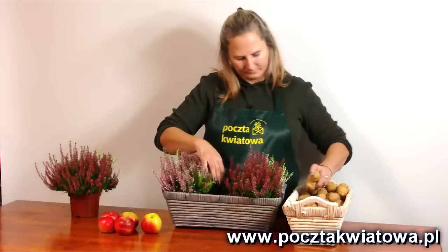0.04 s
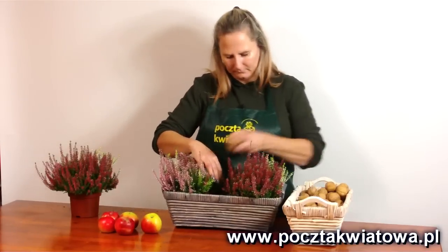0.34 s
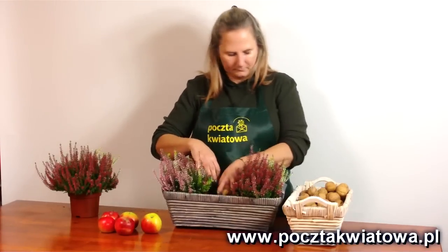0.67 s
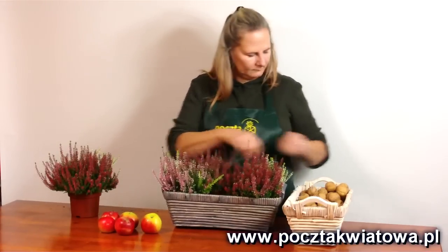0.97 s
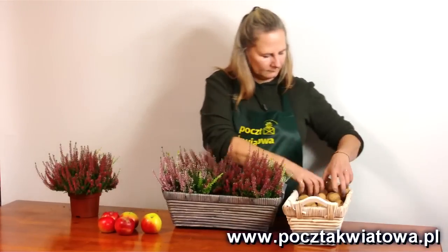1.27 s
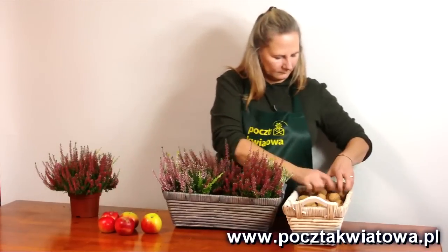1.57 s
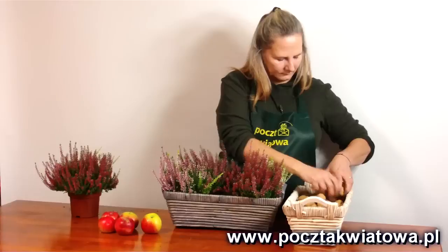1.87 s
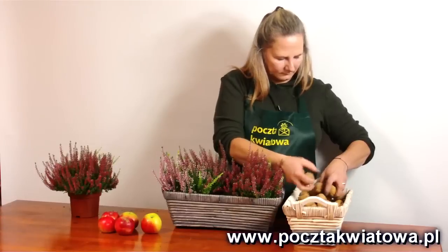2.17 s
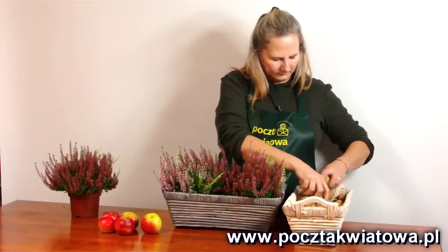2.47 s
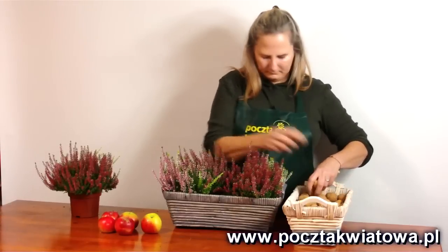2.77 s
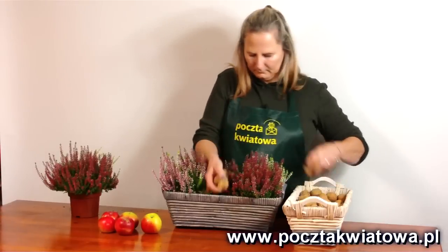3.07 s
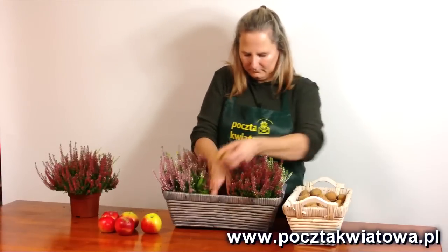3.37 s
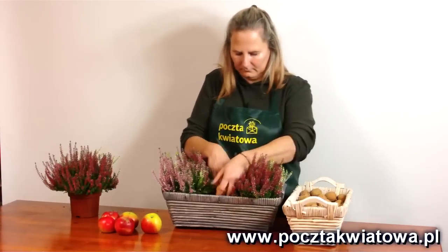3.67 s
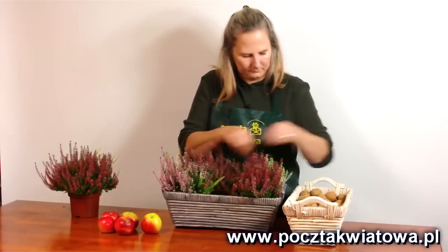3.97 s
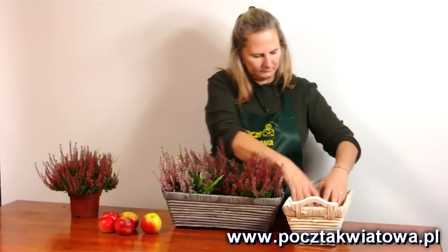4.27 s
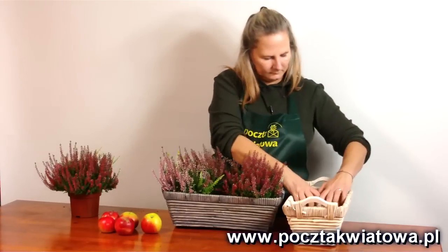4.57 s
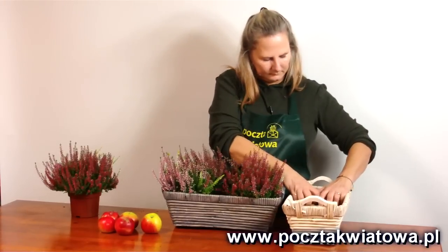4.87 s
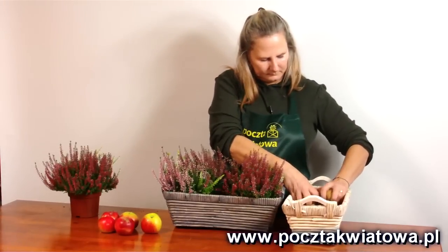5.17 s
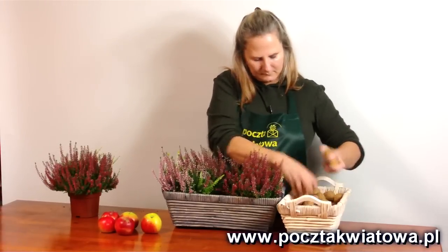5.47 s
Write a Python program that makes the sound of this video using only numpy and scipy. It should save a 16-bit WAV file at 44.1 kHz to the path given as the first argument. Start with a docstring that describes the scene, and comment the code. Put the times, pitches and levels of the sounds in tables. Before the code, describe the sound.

Two handfuls of walnuts drop into a planter with hollow, ringing knocks, between softer clicks of nuts being gathered from a basket.

```python
"""Walnuts into a planter

Walnuts are picked from a wicker basket and dropped by the handful into a planter on a wooden table.
Each knock sounds the hard shell, a bright crack and the hollow under it; in between, nuts rub and roll.
A small bare room rings and hums behind them, heard from one spot by a nearly mono camera microphone."""
import sys
import numpy as np
from scipy import signal
from scipy.fft import rfft, irfft
from scipy.io import wavfile

SR = 44100
rng = np.random.default_rng(int(sys.argv[2]) if len(sys.argv) > 2 else 0)


def digitize_waveform(pressure):
    """Quantize a signal to 16-bit integers and store it at the path in sys.argv[1].

    Rows of a 2-D input are taken as channels; values are limited to [-1, 1].
    """
    field = np.atleast_2d(pressure).T
    bounded = np.clip(field, -1, 1)
    quanta = np.round(bounded * 32767).astype(np.int16)
    wavfile.write(sys.argv[1], SR, quanta)


N = 252693
TIME = np.arange(N) / SR
TAIL = SR // 2  # samples of ring after a knock
HZ = np.fft.rfftfreq(4096, 1 / SR)


# Into the planter: start_s, hollow_db, hollow_hz, shell_db, shell_hz, crack_db (relative to the shell)
PLANTER_DROPS = [(0.7195, -18, 1440, -28, 2030, -6.5), (0.753, -24, 1030, -49, 1850, -14.5),
                 (0.794, -31, 1100, -48.5, 1850, -17), (0.8395, -15.5, 1440, -23.5, 1840, -7),
                 (0.864, -19.5, 1100, -24, 2010, -26), (0.873, -20, 1240, -22.5, 2000, -13),
                 (0.956, -18, 1110, -34.5, 2500, -25), (0.967, -18.5, 1140, -27, 2500, -17.5),
                 (0.992, -30.5, 1080, -42, 2100, -8.5), (1.021, -31, 1120, -34, 2410, -31),
                 (3.345, -24, 1184, -29.5, 2140, -14), (3.397, -15, 1160, -27, 1950, -10),
                 (3.417, -26.5, 1070, -46, 2160, -17), (3.486, -26.5, 1030, -34, 2070, -16),
                 (3.549, -34, 1100, -41, 1940, -16), (3.678, -32, 1200, -30.5, 2350, -13),
                 (3.7629, -29.5, 1010, -25.5, 2130, -21.5), (3.795, -35.5, 1050, -27.5, 2900, -14),
                 (3.849, -30.5, 910, -29.5, 2900, -8.5), (3.889, -32.5, 950, -33.5, 1960, -17.5),
                 (4.003, -34, 1060, -48, 2140, -14), (4.063, -41, 957, -58.5, 1840, -5.5)]
def drops():
    """Handfuls of nuts fall into the planter and set it ringing."""
    out = np.zeros(N)
    for start_s, *nut, crack_db in PLANTER_DROPS:
        add(out, start_s, knock(*nut, crack_db, hollow_direct_db=-7.5, ring_db=-1.5, focus_db=10.5))
    return out


# In the basket: start_s, hollow_db, hollow_hz, shell_db, shell_hz
BASKET_PICKS = [(0.0, -47.5, 1360, -57.5, 1830), (0.239, -44.5, 1260, -41, 3680),
                (1.212, -43, 1150, -58, 1890), (1.244, -66, 1130, -51, 1844),
                (1.288, -42.5, 1137, -64, 1900), (1.436, -42.5, 1340, -52.5, 1850),
                (1.622, -46.5, 1200, -48.5, 2480), (1.706, -40.5, 1580, -58, 1850),
                (2.107, -40, 1150, -36.5, 2100), (2.332, -43.5, 1550, -42.5, 1950),
                (2.411, -45.5, 1470, -50, 1830), (2.456, -43, 1180, -39.5, 1980),
                (2.603, -42.5, 1650, -39, 2330), (2.736, -72, 1370, -53.5, 2500),
                (2.978, -53.5, 1144, -60.5, 1880), (3.016, -49.5, 1380, -53, 2470),
                (3.229, -68, 1420, -52, 2840), (4.255, -46.5, 1130, -60, 1970),
                (4.305, -33, 1110, -38, 2190), (4.33, -32.5, 1084, -60, 2190),
                (4.387, -51, 1090, -37.5, 2880), (4.437, -45, 1760, -33.5, 2850),
                (4.562, -53, 1620, -47.5, 1800), (4.63, -55, 1240, -35.5, 3520),
                (4.653, -39.5, 1340, -37, 3440), (4.791, -35.5, 1500, -37.5, 2700),
                (4.987, -46, 1540, -57, 1880), (5.107, -41.5, 1800, -46, 1920),
                (5.195, -35.5, 1850, -40.5, 1910), (5.276, -43.5, 1050, -52, 1880)]
def picks():
    """Nuts knock together as they are gathered, with less ring."""
    out = np.zeros(N)
    for start_s, *nut in BASKET_PICKS:
        add(out, start_s, knock(*nut, crack_db=-15.5, hollow_direct_db=-6, ring_db=-8, focus_db=12.5))
    return out


# Tone of a knock's three parts at the microphone: frequency_hz, gain_db
HOLLOW_TONE = [(60, -60), (250, -19.5), (580, -23), (730, -5), (1080, 1.5), (1400, -1.5), (1750, -6),
               (2600, -19.5), (6000, -66.5)]
SHELL_TONE = [(200, -39.5), (900, -16.5), (1600, -3.5), (2100, -1), (3300, -5.5), (4300, -14),
              (5500, -27.5), (12000, -62.5)]
CRACK_TONE = [(1000, -34), (3500, -7.5), (4600, -2.5), (5200, -3), (6200, 2), (7800, -1.5), (10000, -5),
              (11400, -10.5), (12400, -4), (13400, -15.5), (15500, -23.5)]
def knock(hollow_db, hollow_hz, shell_db, shell_hz, crack_db, hollow_direct_db, ring_db, focus_db):
    """One nut lands: a shell clack, a bright crack that follows it in strength, then a hollow tock."""
    path = room(direct_db=-6)
    hollow = strike(room(hollow_direct_db), curve(HOLLOW_TONE) + focus_db * bump(hollow_hz, 0.14))
    hollow = knock_energy(hollow + amp(ring_db) * knock_energy(planter_ring(hollow_hz)))
    touch = contact(path, decay_s=0.0006, first_db=4.5)
    shell = strike(touch, curve(SHELL_TONE) + 6 * bump(shell_hz, 0.093))
    crack = strike(contact(path, decay_s=0.0014, first_db=-11), curve(CRACK_TONE))
    sound = amp(shell_db) * (shell + amp(crack_db) * crack)
    add(sound, 0.002995, amp(hollow_db) * hollow)  # the hollow answers 3 ms after the shell
    return sound


def contact(path, decay_s, first_db):
    """Wrinkled shells meet in one touch and a quick cluster of tiny contacts, heard along path."""
    t = np.arange(400) / SR
    cluster = rng.standard_normal(len(t)) * np.exp(-t / decay_s)
    cluster[0] = amp(first_db) * np.linalg.norm(cluster)
    return signal.fftconvolve(path, cluster)[:len(path)]


# Resonances of the planter: pitch_hz, gain_db, t60_s
PLANTER_MODES = [(703, -11, .36), (862, -13, .36), (873, -5.5, 0.3), (935, -8, 0.27), (1065.5, 2.5, 0.22),
                 (1114, 0, 0.34), (1176, -18.5, .22), (1366, -4.5, 0.32), (1500, -22, .25),
                 (1615, -10.5, 0.22)]
def planter_ring(spot_hz, reach_octaves=0.57, rise_s=0.0093):
    """The planter's modes swell and die; the landing spot favours those near spot_hz."""
    hz, db, t60_s = np.transpose(PLANTER_MODES)[:, :, None]
    t = np.arange(TAIL) / SR
    weight = amp(db - 60 * t / t60_s) / (1 + (np.log2(hz / spot_hz) / reach_octaves) ** 2)
    modes = weight * np.sin(2 * np.pi * (hz * t + rng.random(hz.shape)))
    return modes.sum(0) * (1 - np.exp(-t / rise_s))


# The wooden table under the planter: frequency_hz, gain_db
WOOD_TONE = [(40, -36), (110, -17), (160, -2.5), (205, -12.5), (250, 7), (330, -6.5), (500, -5.5),
             (900, -35), (3000, -54)]
# Heavy landings: start_s, level_db
TABLE_THUDS = [(0.723, -49), (0.856, -40.5), (0.884, -40.5), (0.962, -45.5), (3.342, -64.5), (3.395, -60),
               (3.68, -50.5), (3.795, -53)]
def thuds():
    """The heaviest landings reach the table, which answers low."""
    out = np.zeros(N)
    for start_s, db in TABLE_THUDS:
        add(out, start_s, amp(db) * strike(room(direct_db=-3.5), curve(WOOD_TONE)))
    return out


# Clean hits, in basket and planter: start_s, level_db, pitch_hz
SHELL_PINGS = [(0.238, -56.5, 7500), (0.7202, -33, 5920), (0.721, -35, 3060), (2.626, -60, 6850),
               (3.23, -58, 5000), (3.794, -45, 7580), (4.438, -53.5, 9360), (4.563, -61, 6100)]
def pings():
    """A shell is struck so cleanly that one high mode stands out."""
    out = np.zeros(N)
    for start_s, db, hz in SHELL_PINGS:
        add(out, start_s, amp(db) * strike(room(direct_db=-1.5), 45 * bump(hz, 0.13)))
    return out


# Fingers in the basket, nuts rolling to rest in the planter:
# peak_s, swell_s, fade_s, level_db, scratch_db (relative to the rubbing)
BASKET_STROKES = [(1.32, .3, 0.29, -50, -16), (2.01, 0.29, 0.33, -41, -15.5),
                  (2.47, 0.14, 0.23, -42.5, -18), (2.68, 0.13, .4, -60.5, -11),
                  (4.41, 0.24, 0.3, -41.5, -16), (4.57, .15, 0.25, -50, -13),
                  (4.66, 0.13, 0.19, -44.5, -14), (4.98, 0.27, 0.12, -53.5, -13),
                  (5.14, 0.2, .42, -43.5, -15.5)]
PLANTER_ROLLS = [(1.03, 0.046, 0.17, -37.5, -26.5), (3.53, 0.18, 0.42, -40, -17.5),
                 (3.97, 0.29, 0.23, -35, -26)]
def friction(moves, centre_hz, shell_db, table_db, slips_per_s, scratches_per_s, spread_db):
    """Slips of shell on shell sound the hollows and the table; the same movement scratches dry stems."""
    peak_s, swell_s, fade_s, db, scratch_db = np.transpose(moves)[:, :, None]
    # each movement climbs 30 dB over its swell and sinks as far over its fade
    effort = amp(db - 30 * np.maximum((peak_s - TIME) / swell_s, (TIME - peak_s) / fade_s))
    body = amp(curve(HOLLOW_TONE) + 5 * bump(centre_hz, 0.32))
    body += amp(curve(SHELL_TONE) + shell_db) + amp(curve(WOOD_TONE) + table_db)
    rub = slips(effort.sum(0), 20 * np.log10(body), slips_per_s, spread_db)
    scratch = slips((effort * amp(scratch_db)).sum(0), curve(CRACK_TONE), scratches_per_s, spread_db)
    return rub + scratch


def slips(strength, tone_db, per_s, spread_db):
    """Tiny random slips of uneven size, heard across the room."""
    clicks = rng.standard_normal(N) * (rng.random(N) < per_s / SR)
    clicks *= amp(spread_db * np.minimum(rng.exponential(1, N), 3))
    rustle = unit_rms(colour(clicks, tone_db)) * strength
    path = room(direct_db=-6.5)
    return signal.fftconvolve(rustle, path / np.linalg.norm(path))[:N]


# At the basket, the closest-sounding detail: start_s, level_db
WICKER_TICKS = [(1.274, -59.5), (1.372, -67.5), (2.047, -47.5), (2.435, -68), (2.845, -64.5), (3.23, -61),
                (3.597, -62), (4.411, -71), (4.584, -59), (5.156, -59)]
def ticks():
    """Wicker and dry stems tick under the fingers."""
    out = np.zeros(N)
    for start_s, db in WICKER_TICKS:
        touch = contact(room(direct_db=-0.5), decay_s=0.0033, first_db=-11.5)
        add(out, start_s, amp(db) * strike(touch, curve(CRACK_TONE)))
    return out


# Decay of the small bare room: frequency_hz, t60_s
ROOM_DECAY = [(150, 0.41), (400, 0.64), (1000, 0.28), (3500, 0.28), (9000, 0.3), (15000, 0.25)]
def room(direct_db, wall_db=-8, earliest_wall_s=0.0091, rise_s=0.0012):
    """From one spot to the microphone: direct sound, the wall behind, a tail dying band by band."""
    hz, t, bands = signal.stft(rng.standard_normal(TAIL), SR, nperseg=256)
    bands *= amp(-60 * t / curve(ROOM_DECAY, hz)[:, None])
    path = signal.istft(bands, SR)[1][:TAIL]
    path *= 1 - np.exp(-np.arange(TAIL) / SR / rise_s)
    path /= np.linalg.norm(path)
    add(path, earliest_wall_s * rng.uniform(1.0, 1.3), amp([wall_db]))
    path[0] += amp(direct_db)
    return path


# Room noise behind the table: frequency_hz, gain_db
FLOOR_TONE = [(20, -34), (65, -6.5), (110, -16.5), (190, -11.5), (250, -13), (330, -13), (520, -25.5),
              (900, -20), (2000, -26.5), (5000, -35), (6300, -32), (10000, -38.5), (12400, -35),
              (15500, -44.5)]
# Hum and whine in the room: pitch_hz, level_db
HUM_TONES = [(285, -66.5), (7865, -80.5), (3935, -84.5)]
def room_tone(floor_db=-66.5, drift_hz=3, drift_per_s=6):
    """Rumble and hiss under a slightly wavering hum and a thin whine."""
    hz = np.fft.rfftfreq(N, 1 / SR)
    noise = lambda gain: unit_rms(irfft(rfft(rng.standard_normal(N)) * gain, N))
    hum = np.zeros(N)
    for pitch_hz, db in HUM_TONES:
        waver_hz = drift_hz * noise(np.exp(-(hz / drift_per_s) ** 2))
        hum += amp(db) * unit_rms(np.sin(2 * np.pi * np.cumsum(pitch_hz + waver_hz) / SR))
    return hum + amp(floor_db) * noise(amp(curve(FLOOR_TONE, hz)))


def amp(db):
    return 10 ** (np.asarray(db) / 20)


def unit_rms(x):
    return x / np.sqrt(np.mean(x ** 2) + 1e-20)


def knock_energy(x):
    """Scales x to the energy of 30 ms at 0 dB."""
    return x * np.sqrt(0.03 * SR / np.sum(x ** 2))


def strike(impact, tone_db):
    """An impact given a tone and a standard energy."""
    return knock_energy(colour(impact, tone_db))


def curve(points, hz=HZ):
    """Joins rows of frequency_hz, value on a log-frequency axis."""
    point_hz, value = np.transpose(points)
    return np.interp(np.log(hz + 1), np.log(point_hz), value)


def bump(hz, octaves):
    """A bell of height 1 around a resonance."""
    return np.exp(-0.5 * (np.log2((HZ + 1) / hz) / octaves) ** 2)


def colour(x, db):
    """Causal filter with the gain db on the grid HZ."""
    log_gain = np.log(amp(np.r_[db, db[-2:0:-1]]))
    taps = np.fft.ifft(np.exp(np.conj(signal.hilbert(log_gain)))).real
    return signal.fftconvolve(x, taps[:len(HZ)])[:len(x)]


def add(mix, start_s, sound):
    part = mix[max(round(start_s * SR), 0):][:len(sound)]
    part += sound[:len(part)]


# Difference between the microphone's two ports: frequency_hz, side_db
PORT_DIFFERENCE = [(50, -23), (1000, -31.5), (4000, -25), (8000, -11), (15000, -10.5)]
def scene(lean_right_db=0.24):
    """Two closely spaced ports hear almost the same, parting slightly in the treble."""
    stirring = friction(BASKET_STROKES, centre_hz=1600, shell_db=-6.5, table_db=-13.5,
                        slips_per_s=350, scratches_per_s=320, spread_db=4)
    rolling = friction(PLANTER_ROLLS, centre_hz=891, shell_db=-17, table_db=-28.5,
                       slips_per_s=400, scratches_per_s=180, spread_db=6)
    mid = amp(-0.52) * drops() + amp(-3.5) * picks() + thuds() + pings() + ticks() + stirring + rolling
    scatter = rng.standard_normal(300) * np.hanning(300)
    scattered = signal.fftconvolve(mid, scatter / np.linalg.norm(scatter))[:N]
    side = colour(scattered, curve(PORT_DIFFERENCE))
    side += colour(room_tone(), curve(PORT_DIFFERENCE) + 3)  # the room is a little wider than the nuts
    mid += room_tone()
    return np.array([mid + side, mid - side]) * amp([[-lean_right_db], [lean_right_db]])


def record(dry, edge_hz=15750):
    """The camera's steep band limit."""
    lowpass = signal.firwin(511, edge_hz, window=("kaiser", 9), fs=SR)
    return signal.oaconvolve(dry, lowpass[None], "same")


dry = scene()
out = record(dry)
digitize_waveform(out)
```